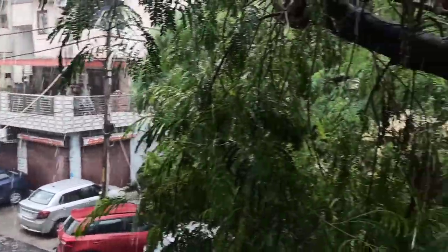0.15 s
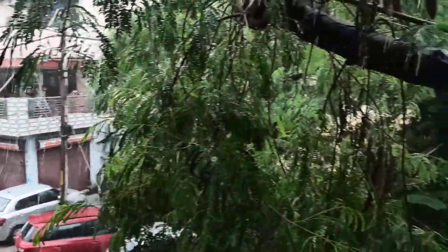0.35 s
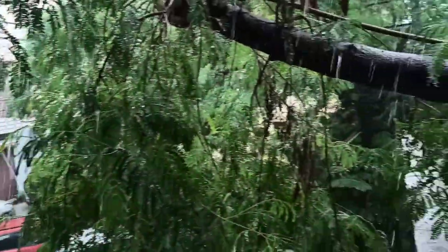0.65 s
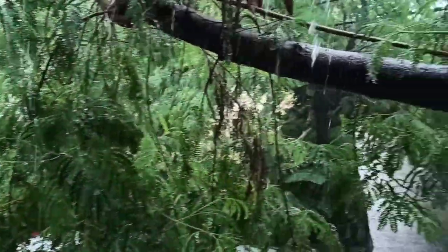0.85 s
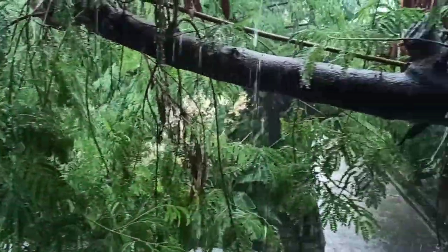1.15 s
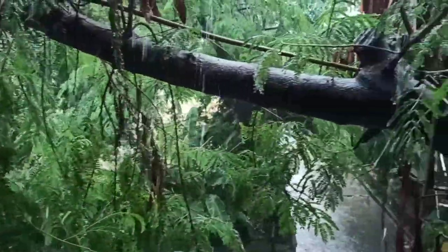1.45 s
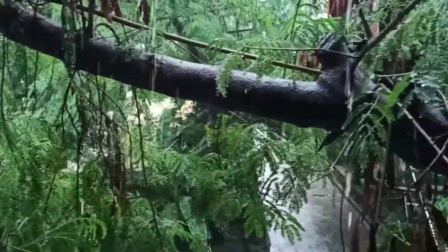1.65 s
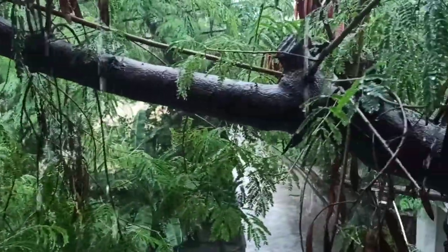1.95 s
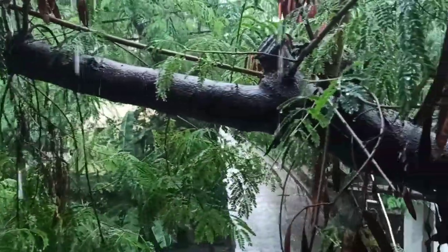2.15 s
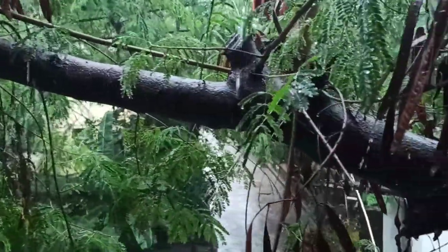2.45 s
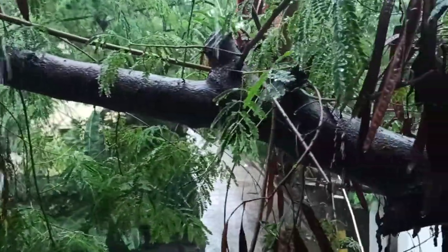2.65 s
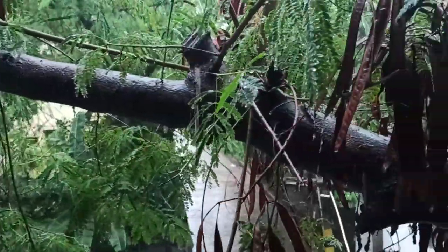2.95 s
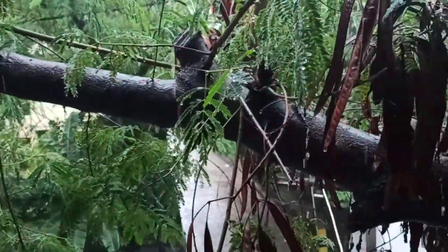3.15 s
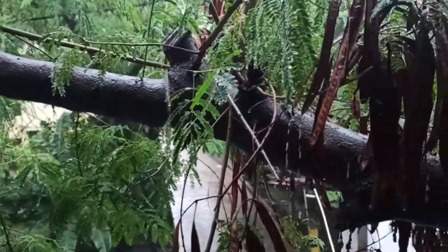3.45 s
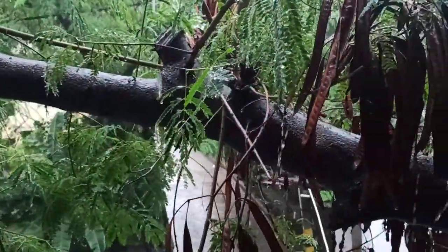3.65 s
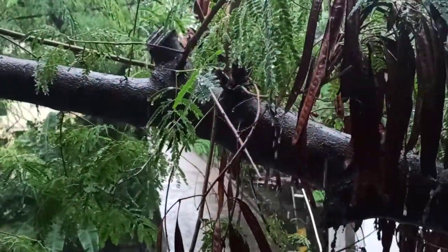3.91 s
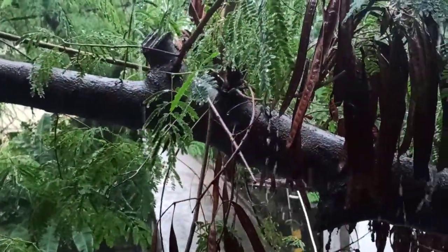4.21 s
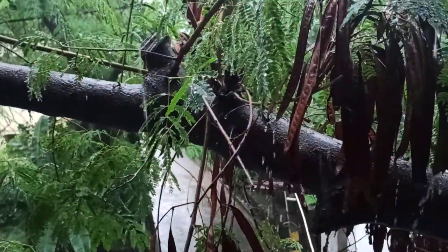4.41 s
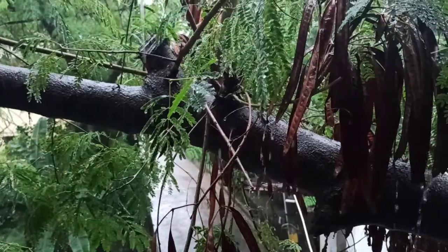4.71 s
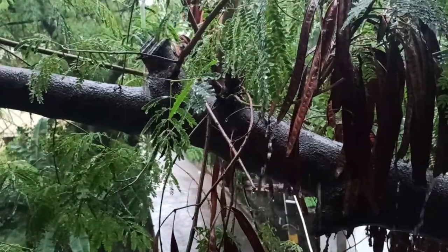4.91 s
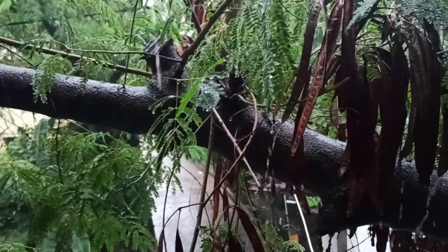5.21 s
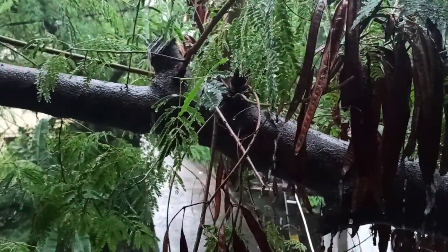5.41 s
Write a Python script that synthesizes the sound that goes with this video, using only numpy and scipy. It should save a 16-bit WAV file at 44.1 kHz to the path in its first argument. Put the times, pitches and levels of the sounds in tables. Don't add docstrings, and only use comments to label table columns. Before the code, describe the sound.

A downpour on trees and street: even rushing hiss, dull drumming on a sheet roof, and bright nearby drips ticking on wet leaves.

```python
import sys
import numpy as np
from scipy import signal
from scipy.fft import rfft, irfft, next_fast_len
from scipy.io import wavfile

SR = 44100
rng = np.random.default_rng(int(sys.argv[2]) if len(sys.argv) > 2 else 0)


def gain_from_decibels(decibels):
    exponent = np.asarray(decibels, float) / 20
    return 10 ** exponent


def int16_out(signal):
    q = np.round(np.clip(np.atleast_2d(signal).T, -1, 1) * 32767)
    wavfile.write(sys.argv[1], SR, q.astype(np.int16))


N = 245637
SIZE = next_fast_len(N)
HZ = np.maximum(np.arange(SIZE // 2 + 1) * SR / SIZE, 1)


def rms_one(x):
    return x / np.sqrt(np.mean(x ** 2) + 1e-20)


def in_time(rows):
    s, db = np.transpose(rows)
    return np.interp(np.arange(N) / SR, s, db)


def on_hz(rows):
    hz, *columns = np.transpose(rows)
    return gain_from_decibels([np.interp(np.log(HZ), np.log(hz), db) for db in columns])


def colour(x, gain):
    return irfft(rfft(x, SIZE) * gain, SIZE)[..., :N]


def drift(rate):
    r = np.exp(-80 * np.pi * rate / SR)
    slow = signal.lfilter([1], [1, -2 * r, r * r], rng.standard_normal(N // 40 + 2002))[2000:]
    return np.interp(np.arange(N) / 40, np.arange(len(slow)), rms_one(slow))


def patter(per_s, spread_db, fade_ms):
    sizes = gain_from_decibels(2 * spread_db * np.minimum(rng.exponential(1, N), 4))
    power = sizes * (rng.random(N) < per_s / SR) + 1e-18
    power = signal.lfilter([1], [1, -np.exp(-1000 / (fade_ms * SR))], power)
    return power / power.mean()


def all_around():
    mic_gap_m, sound_m_per_s, left_lead_s = 0.16, 343, 0.00033
    first, other = rfft(rng.standard_normal((2, SIZE)))
    aimed = 0.26 * np.exp(-(HZ / 2200) ** 2)
    diffuse = (1 - aimed) * np.sinc(2 * HZ * mic_gap_m / sound_m_per_s)
    alike = 0.992 * (diffuse + aimed * np.exp(-2j * np.pi * HZ * left_lead_s))
    second = alike * first + np.sqrt(1 - np.abs(alike) ** 2) * other
    return irfft([first, second], SIZE)[:, :N]


def splashing(shared, own, near_share, flicker_db):
    power = 1 - near_share + near_share * (0.71 * shared + 0.37 * own)
    return np.sqrt(power) * gain_from_decibels(flicker_db * drift(18))


def road(swing_db):
    # frequency in Hz, level in dB per Hz
    roar = [(15, -42), (32, -41.5), (42, -37), (65, -17.5), (90, -6), (135, -4), (210, -6.5), (500, -4.5),
            (650, -4.5), (900, -7.5), (1100, -15.5), (1430, -29), (2400, -100)]
    # time in seconds, lift of the bass in dB
    rumble = [
        (0.0, -2.5),
        (1.2, -1.8),
        (1.6, .3),
        (3.2, .3),
        (3.7, 2.2),
        (4.8, 1),
        (5.57, -0.5),
    ]
    roaring = rms_one(colour(all_around(), on_hz(roar)))
    bass = colour(roaring, 1 / (1 + (HZ / 190) ** 4))
    roaring = roaring + (gain_from_decibels(in_time(rumble)) - 1) * bass
    return gain_from_decibels(-25.5 + 0.54 * swing_db) * roaring


def roof(swing_db):
    # frequency in Hz, width in Hz, level in dB
    modes = [(281.2, 33, 0), (342.6, 90, 1)]
    # middle in seconds, length in seconds, lift in dB
    sheets = [(0.01, .08, 1.5), (0.11, .06, -5), (0.21, .16, 4.5), (0.395, .05, 6), (0.53, 0.18, 5),
              (1.433, .2, 4), (1.674, 0.058, 0.5), (3.65, .15, 4), (4.1, .05, -1), (4.47, 0.07, -8.5),
              (4.58, .08, 1), (4.9, 0.18, 1.5)]
    ringing = sum(gain_from_decibels(db) / (1 + ((HZ - hz) / width) ** 2 * 4) for hz, width, db in modes)
    drumming = rms_one(colour(rng.standard_normal(N), ringing)) * gain_from_decibels([[0.3], [-0.3]])
    s, length, lift_db = np.transpose(sheets)[:, :, None]
    swell_db = lift_db * np.exp(-((np.arange(N) / SR - s) / length * 2) ** 2)
    level_db = -30.15 + 0.53 * swing_db + 0.77 * drift(7.0) + swell_db.sum(axis=0)
    return gain_from_decibels(level_db) * drumming


def leaves(rain_db, shared, gust):
    # frequency in Hz, left level in dB, right level in dB
    hiss_rows = [(600, -23, -32), (847, -8, 1), (1190, 0.5, 0), (1620, -2.5, 0.95), (2620, -5, -3),
                 (3420, -4, -0.5), (4700, -4, -0.5), (9000, -3, 0)]
    edges_hz = [400, 2000, 4760, 6110, 7670, 10000]
    near_shares = [0.019, 0.19, 0.22, 0.22, 0.41]
    hiss = colour(all_around(), on_hz(hiss_rows))
    out = np.zeros((2, N))
    for low, high, near in zip(edges_hz[:-1], edges_hz[1:], near_shares):
        own = patter(120, spread_db=3.5, fade_ms=5.4)
        gain = splashing(shared, own, near, flicker_db=0.58)
        out += colour(hiss * gain * gust ** near, (HZ >= low) & (HZ < high))
    return gain_from_decibels(rain_db + 5.5) * rms_one(out)


def spray(swing_db, shared, gust):
    own = patter(90, spread_db=3.0, fade_ms=3)
    gain = splashing(shared, own, near_share=0.24, flicker_db=0.6)
    mist = rms_one(colour(all_around() * gain * gust ** 0.8, HZ > 10000))
    return gain_from_decibels(-32 + 1.3 * swing_db) * mist


def edge_leaks():
    count, block, first_block = 36, 1024, 852
    edge_hz, reach_hz, line_hz = 8656, 55, SR / 2048
    when, far, strength = rng.random((count, 3)).T
    s = (first_block + block * np.floor(when ** 0.7 * (N // block))) / SR
    lines_up = np.minimum(np.floor(-np.log(far) * reach_hz / line_hz), 14)
    return list(zip(s, edge_hz + line_hz * lines_up, -55 - 12 * strength ** 2))


def leaks():
    # middle in seconds, frequency in Hz, level in dB
    inner = [(0.006, 9300, -64), (0.493, 9905, -66), (1.968, 9087, -55), (1.968, 9173, -55),
             (2.113, 10529, -66), (2.74, 9302, -55), (2.734, 9043, -60), (3.361, 9151, -58),
             (3.361, 9237, -59), (4.133, 8936, -54), (2.078, 8807, -55), (2.392, 8871, -57),
             (2.438, 8871, -57), (3.036, 8871, -58), (3.17, 8850, -56), (3.57, 8828, -57),
             (3.715, 8871, -57), (4.592, 8893, -58), (5.474, 8850, -60)]
    out, n = np.zeros((2, N + 2048)), np.arange(2048)
    arch = np.sin(np.pi * n / 2048) ** 2
    for s, hz, level_db in [*inner, *edge_leaks()]:
        i = round(s * SR)
        tone = arch * np.sin(2 * np.pi * hz * n / SR)
        left_sign = -1 if hz < 8800 and rng.random() < 0.25 else 1
        out[:, i:i + 2048] += gain_from_decibels(level_db + 5.5) * tone * [[left_sign], [1]]
    return out[:, 1024:N + 1024]


def drops(rows, spread, fade_ms, tail, gain_db):
    tick = 5.3
    out, ms = np.zeros((2, N + 1300)), np.arange(1300) / SR * 1000
    fade = (1 - np.exp(-ms / 0.35)) * (np.exp(-ms / fade_ms) + tail * np.exp(-ms / 7))
    for s, peak_db, hz, pan_db in rows:
        band = signal.butter(2, [hz / spread, hz * spread], "band", fs=SR, output="sos")
        splash = rng.standard_normal((2, len(ms))) * fade
        burst = signal.sosfilt(band, splash - tick * (ms == 0))
        burst = burst / np.abs(burst).max(axis=1, keepdims=True)
        level = gain_from_decibels(min(peak_db, -9.5) + gain_db) * gain_from_decibels([[pan_db / 2], [-pan_db / 2]])
        i = round(s * SR)
        out[:, i:i + len(ms)] += level * burst
    return out[:, :N]


def spits():
    # start in seconds, peak in dB
    bursts = [(0.2274, -26), (0.3581, -31), (0.9951, -23), (1.6167, -24), (1.6836, -27), (1.9694, -25),
              (2.4947, -22), (2.5825, -25), (2.8454, -25.5), (3.2939, -21.5), (3.681, -26), (4.0143, -24),
              (4.2038, -25.5), (4.2517, -24), (4.2946, -26), (4.4538, -24.5), (4.5027, -21),
              (4.5471, -24.5), (4.7062, -21.5), (4.8708, -21.5), (4.9596, -26), (5.0644, -23.5),
              (5.1696, -21), (5.4545, -25)]
    rows = [(s, peak_db, 13400, -3.5) for s, peak_db in bursts]
    return drops(rows, spread=1.2, fade_ms=1.5, tail=0.3, gain_db=4.5)


def plops():
    # start in seconds, peak in dB, pitch in Hz, left-over-right in dB
    hits = [
        (0.5216, -18.5, 4000, -5),
        (2.6802, -14, 4530, -7),
        (3.0505, -18, 4610, -5),
        (3.1582, -17.5, 2560, -4.5),
        (3.4924, -18, 4240, -3),
        (4.0138, -20.5, 2390, -10),
        (4.671, -23, 1680, -2),
        (4.7875, -14, 3000, -2),
    ]
    return drops(hits, spread=1.07, fade_ms=5.0, tail=0.5, gain_db=-4)


def slaps():
    # start in seconds, peak in dB, pitch in Hz, left-over-right in dB
    hits = [
        (2.8, -14.5, 4000, -4),
        (2.8, -12, 3200, -3.5),
        (3.3900, -13, 2100, -5),
        (1.6185, -15, 2200, -3.5),
    ]
    return drops(hits, spread=1.7, fade_ms=1.5, tail=0.2, gain_db=-0.5)


def drips():
    # start in seconds, peak in dB, pitch in Hz, left-over-right in dB
    hits = [(1.6315, -9, 6770, 4), (1.683, -20, 7530, 3), (1.8412, -13.5, 6600, 1.0),
            (2.0203, -18, 6750, 1), (2.2488, -18.5, 6560, 2.0), (2.3351, -18, 6270, -0.5),
            (2.368, -14, 7590, -4), (2.5336, -11.5, 6410, 1), (2.6314, -18, 6800, -5),
            (2.7382, -11, 7440, -3.5), (2.9223, -15, 6820, -0.5), (3.05, -16.5, 6220, -3),
            (3.276, -17, 6850, 1.5), (3.2954, -12, 6650, -1), (3.3169, -16, 6760, -0.5),
            (3.3378, -18.5, 6710, -1), (3.713, -10, 7600, 4), (3.8791, -12.5, 7450, 2),
            (3.9285, -15, 6610, -1.5), (4.141, -15, 6700, -4), (4.2448, -15, 6830, -1.0),
            (4.4119, -14, 7630, -0.5), (4.4687, -17, 7600, 0.5), (4.5513, -13, 6780, -0.5),
            (4.7293, -10.5, 6190, -1.5), (4.7985, -19, 6900, -3), (4.8454, -19.5, 7620, -0.5),
            (5.102, -14, 6780, -1), (5.4869, -15, 7540, 6)]
    return drops(hits, spread=1.19, fade_ms=2.6, tail=0.45, gain_db=1.5)


def scene():
    # time in seconds, level in dB
    downpour = [(0.0, -25), (0.5, -26.5), (0.9, -27), (1.5, -26.5), (2.6, -26.5), (3.3, -26.5),
                (4.0, -27.5), (4.4, -28), (4.75, -26.5), (5.1, -28), (5.57, -28)]
    rain_db = in_time(downpour)
    swing_db = rain_db - rain_db.mean()
    shared = patter(150, spread_db=3.5, fade_ms=5.8)
    gust = gain_from_decibels(1.2 * drift(9.7))
    far = road(swing_db) + roof(swing_db)
    trees = leaves(rain_db, shared, gust) + spray(swing_db, shared, gust)
    close = spits() + plops() + slaps() + drips()
    return far + trees + close


def low_pass(x):
    return signal.sosfilt(signal.butter(12, 16000, fs=SR, output="sos"), x)


def record(dry):
    # lower edge in Hz, left and right level in dB, left and right slope in dB per kHz
    stairs = [(4745, -8, -7.5, 3.5, -1.7), (6144, 0, -1, 1.5, 1.2), (6930, -3, -5.5, 11, 5.5),
              (7606, -2, -6.5, -0.5, -0.5), (8514, -12, -11, -90, -91), (8500, -92, -89, 0, -3),
              (11600, -2, 0, 0, -.5), (12920, -3, 2.5, 1, -0.9), (15440, -21, -23, -46, -45.5),
              (15860, -89.5, -89, 1, -.1)]
    gain = np.ones((2, len(HZ)))
    for hz, left_db, right_db, left_slope, right_slope in stairs:
        above = HZ >= hz
        khz_up = (HZ[above] - hz) / 1000
        gain[:, above] = gain_from_decibels([left_db + left_slope * khz_up, right_db + right_slope * khz_up])
    mix = colour(dry, gain) + leaks()
    return low_pass(mix)


dry = scene()
out = record(dry)
int16_out(out)
```